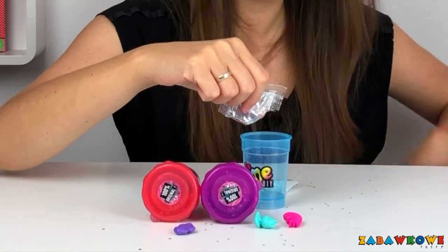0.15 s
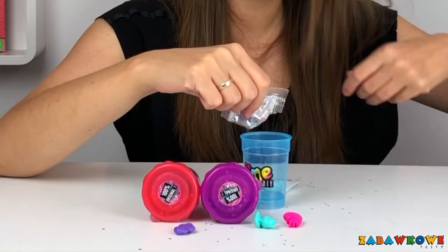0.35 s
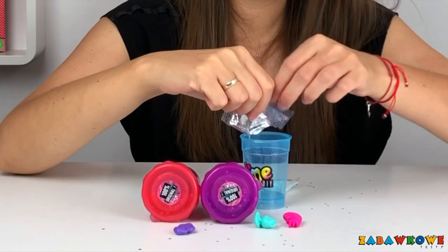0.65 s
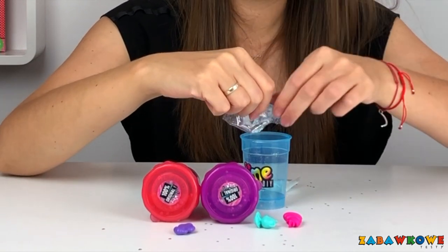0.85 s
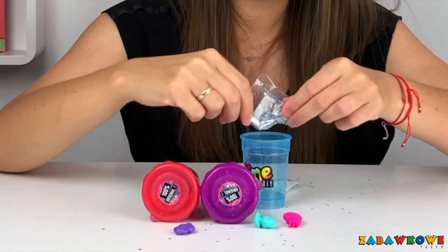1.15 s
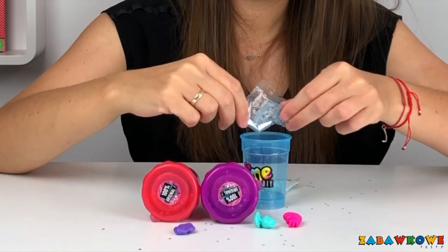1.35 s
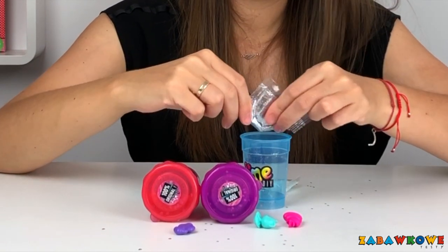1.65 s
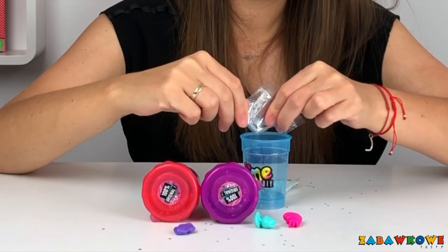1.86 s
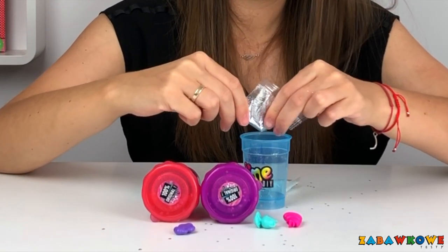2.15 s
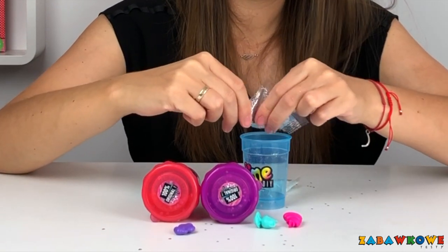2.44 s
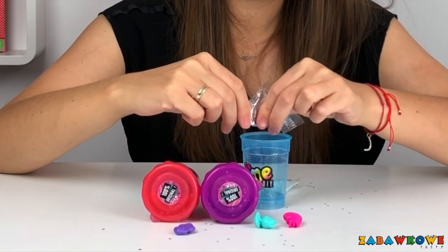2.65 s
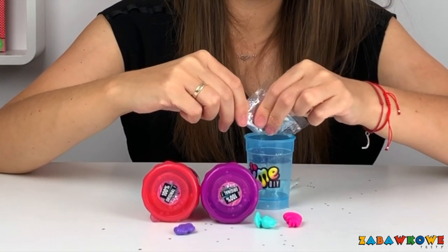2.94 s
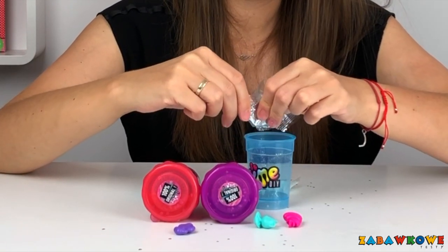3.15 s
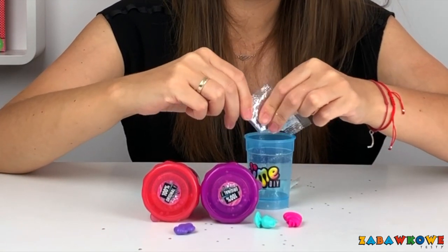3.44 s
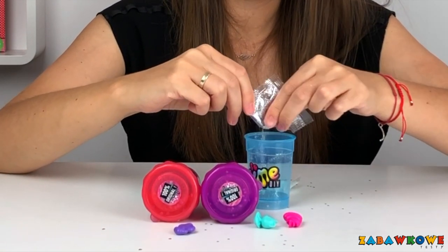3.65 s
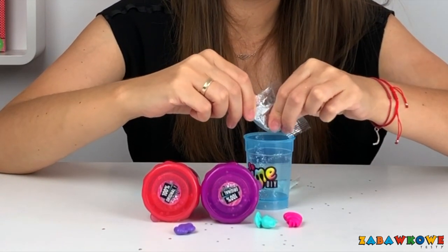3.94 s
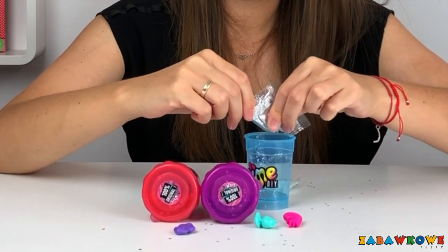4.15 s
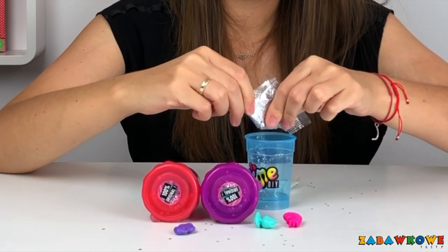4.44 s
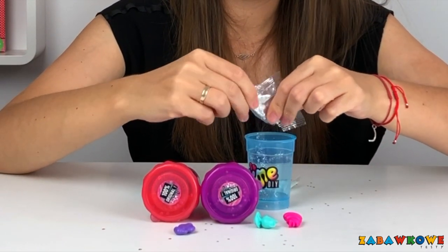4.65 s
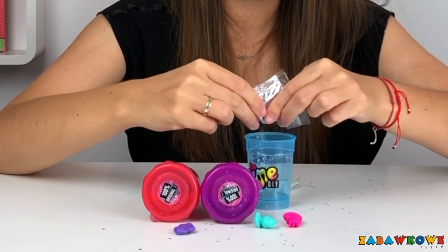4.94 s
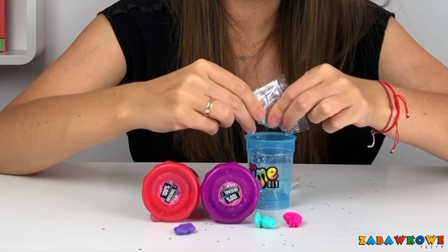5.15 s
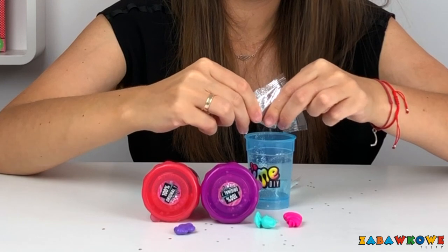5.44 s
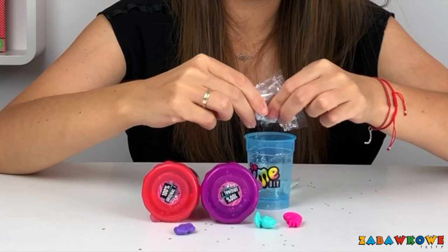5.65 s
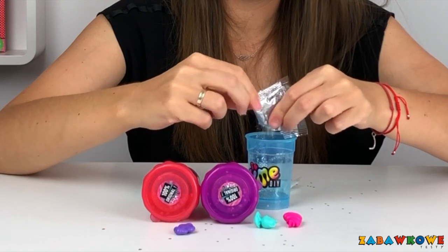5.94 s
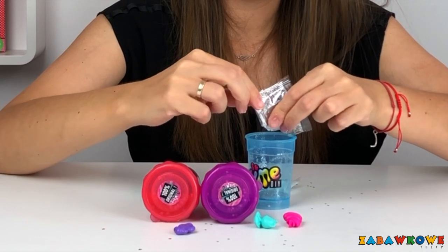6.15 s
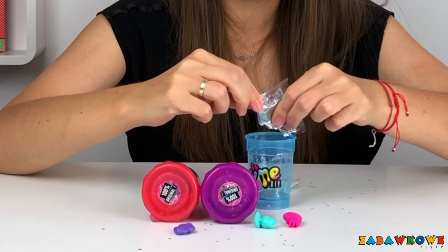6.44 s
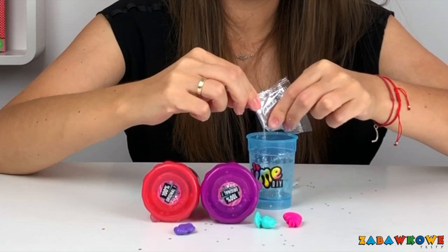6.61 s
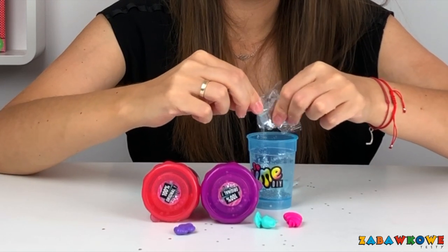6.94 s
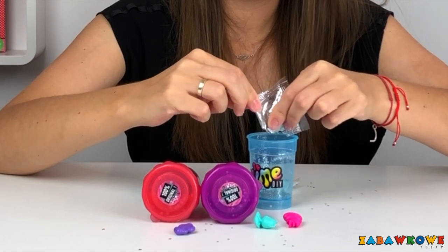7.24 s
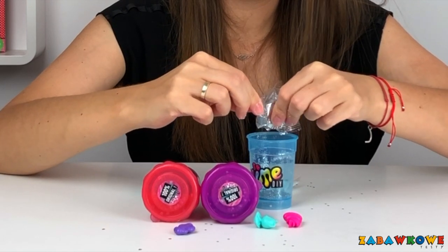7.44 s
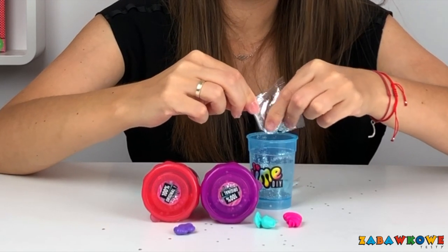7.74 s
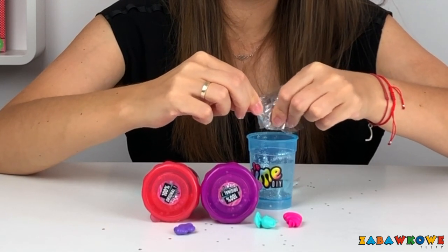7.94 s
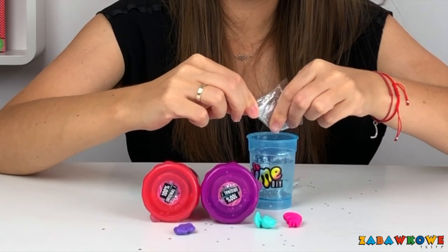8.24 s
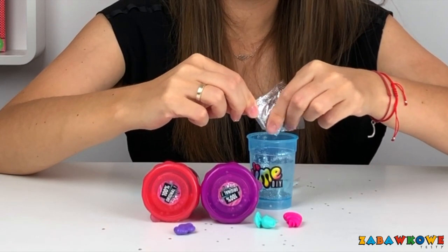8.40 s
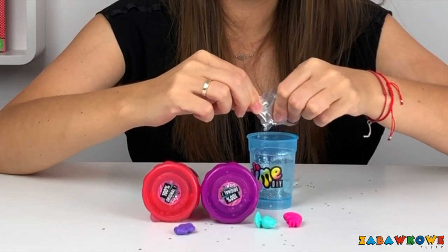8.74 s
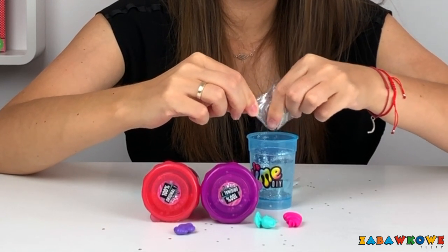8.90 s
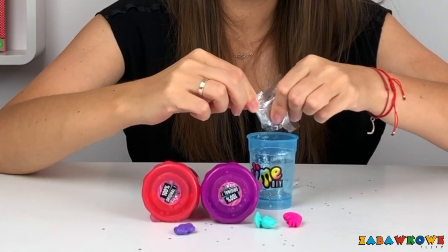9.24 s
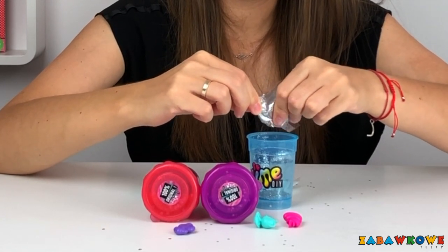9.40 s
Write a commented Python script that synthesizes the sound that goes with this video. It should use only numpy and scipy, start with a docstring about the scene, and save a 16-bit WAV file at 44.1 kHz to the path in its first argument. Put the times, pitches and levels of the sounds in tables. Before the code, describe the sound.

A quiet indoor room heard through a microphone worn on the body: lumpy deep rumble and faint hiss, easing slightly by 3 s. A soft cloth brush passes in the first half second. From about 0.4 s, very low heartbeat thuds repeat roughly every 0.8 s. Around 0.6 s the first small plastic crackles appear, then stay sparse and light until 1.6 s. From 2 s squeezes of the sachet come faster, with crisp bright cracks, duller pops and fine crinkle between them. Brief lulls fall near 3.7, 4.4 and 4.9 s. Soft muffled grip bumps come near 2.9, 4.3, 5.5, 6.3 and 7.7 s. At 6.6 s a single light tap gives a short, hollow plastic knock. From 6.8 s to the end the crackling is densest and loudest, in uneven bursts, with a slight table reflection and short room tail.

```python
"""Quiet room: body sway rumbles into a worn microphone under hiss; a sleeve brushes past and film faintly crinkles.
The heart thuds in as slowing deep cycles. Fingers then squeeze a small plastic sachet over a plastic cup: noise
bursts make each crease a bright crack with a duller pop, above a crinkle of many small ones that grows denser.
From about 3 s, soft low noise swells mark shifts of grip; late on, one tap rings the cup as decaying modes.
Film, thuds and cup get a table-top echo and a room tail of decaying noise."""
import sys
import numpy as np
from scipy import signal
from scipy.fft import rfft, irfft, next_fast_len
from scipy.io import wavfile
from scipy.ndimage import uniform_filter1d, map_coordinates

SR = 44100
rng = np.random.default_rng(int(sys.argv[2]) if len(sys.argv) > 2 else 0)


def master(y):
    """Save y as 16-bit WAV."""
    cut = np.clip(np.atleast_2d(y).T, -1, 1)
    pcm = np.round(cut * 32767)  # scale
    wavfile.write(sys.argv[1], SR, pcm.astype(np.int16))


N = 422037

# spectrum of sway and hiss together, relative: (f/Hz, level/dB)
HUSH_SPECTRUM = [(4, -2), (12, -4), (40, -16), (110, -29), (300, -34), (1000, -42), (1750, -45),
                 (2000, -39), (2250, -51.5), (5000, -51), (16000, -61)]
# cloth brushing as an arm moves: (t/s, level/dB)
SLEEVE_LEVEL = [(0, -65), (.05, -50), (.25, -58.5), (.5, -74)]
# squeezes of the sachet: (grip closed t/s, effort level/dB, held t/s)
SQUEEZES = [(.62, -47, 0.031), (.862, -56, 0.0035), (1.048, -60, 0.022), (1.635, -52, 0.018),
            (1.851, -55, 0.014), (1.931, -51.5, 0.14), (2.135, -51, 0.037), (2.265, -46.5, 0.066),
            (2.423, -45, 0.11), (2.81, -39.5, 0.019), (3.067, -41.5, 0.041), (3.34, -46.5, 0.13),
            (3.61, -47.5, 0.0095), (3.732, -48.5, 0.016), (3.881, -50, 0.012), (4.001, -43.5, 0.065),
            (4.224, -41, 0.018), (4.47, -58, .06), (4.59, -46, 0.02), (4.771, -43, 0.046),
            (4.87, -51, 0.045), (5.175, -42, 0.033), (5.454, -43, 0.0098), (5.6, -50.5, 0.012),
            (5.722, -38.5, 0.019), (6.015, -40.5, 0.013), (6.321, -41, 0.0079), (6.459, -45.5, 0.082),
            (6.585, -40, 0.0067), (6.82, -40, 0.12), (7.163, -39, 0.022), (7.374, -40, 0.007),
            (7.5, -48.5, 0.14), (7.699, -38.5, 0.016), (7.87, -42.5, 0.03), (7.935, -38, 0.13),
            (8.24, -36, 0.076), (8.549, -36, 0.02), (8.4, -45, 0.05), (8.715, -41.5, 0.053),
            (8.9, -34, 0.054), (9.05, -41.5, 0.018), (9.239, -34.5, 0.0068), (9.361, -45.5, 0.11),
            (9.568, -37.5, 0.0072)]
# colour of the cracks, relative: (f/Hz, level/dB)
CRACK_SPECTRUM = [(300, -76), (1300, -8), (2200, -9.5), (3250, -4.5), (3870, -12.5), (4350, -8), (5570, -5),
                  (7580, -5), (10800, -9), (16000, -11)]
# colour of the pops, relative: (f/Hz, level/dB)
POP_SPECTRUM = [(150, -38), (250, -14), (370, -3.5), (780, 1), (1080, -6.5), (1350, 0.5), (2600, -8.5),
                (4000, -14), (7000, -103)]
# centre of the band the cracks favour, lower while a wide fold is worked: (t/s, f/Hz)
FOLD_BAND = [(2.95, 6830), (3.07, 3160), (3.25, 6750), (5.62, 6500), (5.76, 2560), (5.9, 6500)]
# heartbeats, first one and period: (t/s)
BEATS = 0.4 + 0.77 * np.arange(14)
# crease snaps that stand out from the crinkle around them, faint to loud:
# (t/s, crack energy level/dB, pop energy level/dB)
SNAPS = [(0.6137, -15.5, -12), (0.6229, -10, -14), (0.6925, -28, -18.5), (0.754, -12.5, -11.5),
         (0.8538, -19, -36), (0.8752, -42, -30), (0.9234, -31, -20.5), (1.0237, -19.5, -20.5),
         (1.174, -42, -31), (1.2745, -48.5, -29), (1.378, -30.5, -31), (1.449, -27, -27.5),
         (1.543, -22, -26), (1.589, -39, -21.5), (1.7337, -10.5, -21), (1.8034, -17.5, -16.5),
         (1.9083, -9.0, -18), (1.9652, -22, -18.5), (2.091, -10.5, -21), (2.1301, -13.5, -16.5),
         (2.172, -12.5, -33), (2.2002, -8.5, -24.0), (2.2269, -11.5, -34), (2.2454, -3.5, -15.5),
         (2.2829, -14, -9), (2.3733, -13.5, -19), (2.4239, -14, -13), (2.5128, -9.5, -38), (2.574, -4, -18),
         (2.5902, -4.5, -36), (2.7388, -10.5, -28), (2.7828, -6.5, -34.5), (2.795, -6.5, -16.0),
         (2.803, -8, -21), (3.0026, -6.5, -16), (3.0303, -4, -27), (3.0398, -6, -15), (3.0773, -4.5, -13),
         (3.1297, -6, -41), (3.1944, -4.5, -51), (3.277, -7.5, -27), (3.3276, -11, -20), (3.402, -9.5, -12),
         (3.5869, -16, -11), (3.6182, -13.5, -14.5), (3.806, -16.5, -26), (3.8631, -16.0, -20),
         (3.8694, -15.0, -19), (3.9188, -21, -13.5), (3.9819, -4.5, -18.5), (4.0005, -9.5, -20),
         (4.0567, -5, -40), (4.071, -1, -18), (4.14, -11.5, -17), (4.1733, -3, -11.5), (4.2112, -11.0, -27),
         (4.2245, -9, -14), (4.2507, -11, -11), (4.3373, -23.5, -17), (4.369, -24, -23),
         (4.4071, -33, -24.5), (4.46, -24, -23), (4.5008, -16.5, -27.0), (4.5428, -17.5, -23),
         (4.5664, -13.0, -10.5), (4.5758, -3.5, -28), (4.622, -8.5, -22.5), (4.6379, -7, -10.0),
         (4.6847, -9, -27), (4.7262, -5.0, -19), (4.7689, -3.5, -9.5), (5.0185, -30, -52),
         (5.096, -17, -9.5), (5.173, -2, -12), (5.1814, -6.5, -22.0), (5.2194, -19, -11.5),
         (5.2771, -9, -16), (5.397, -13, -24.0), (5.4227, -4.5, -15), (5.4337, -11.5, -20),
         (5.446, -12, -26), (5.4589, -8, -13.5), (5.6145, -19, -21.5), (5.642, -23, -42),
         (5.7012, -3.5, -12.5), (5.731, -10, -12), (5.7496, -7, -20), (5.7799, -4, -12), (5.978, -22, -23),
         (6.0319, -6.5, -12.5), (6.0606, -8.5, -13.5), (6.2781, -4, -8.5), (6.3113, -5, -10),
         (6.323, -13, -10.5), (6.4487, -4.5, -34), (6.4665, -21, -29.0), (6.5002, -7.5, -13.5),
         (6.538, -4.5, -26), (6.5916, -5.5, -13), (6.6074, -4, -8.5), (6.7842, -4, -18.5), (6.823, -5, -25),
         (6.8485, -9, -19), (6.8627, 0, -5.0), (6.8693, -14, -27), (6.8907, -4.5, -13),
         (6.921, -6.5, -37.0), (6.981, -4, -6), (7.085, -9.0, -30), (7.1019, 1, -17), (7.1488, -2.5, -9.5),
         (7.2758, -12, -37), (7.3574, -4, -12), (7.3672, -5.5, -6.5), (7.417, -10.5, -44),
         (7.4823, -5.5, -18.5), (7.5344, -10.5, -30), (7.5468, -7.5, -14), (7.684, -2.5, -24),
         (7.6978, -9.5, -14.5), (7.7084, -8, -24), (7.7137, -5, -31), (7.9086, -3.0, -28.5),
         (7.9505, -3.5, -32), (8.0258, -6.5, -33), (8.1304, 0.5, -23), (8.2339, -3, -32),
         (8.2619, -10, -10.5), (8.276, -16, -24.0), (8.383, -5.5, -22.5), (8.3958, -6, -13),
         (8.4777, -5.5, -25), (8.5732, -5, -4.5), (8.633, -5.0, -11), (8.689, -4.5, -32), (8.7115, -9, -37),
         (8.784, -3, -35), (8.9161, -3, -28), (8.9409, -9, -2), (8.9756, -4.5, -29), (9.1192, -2.5, -37),
         (9.2099, -7, -18.5), (9.2254, -3.5, -6), (9.3547, -4, -15.5), (9.4197, -4.5, -33),
         (9.5416, -1.5, -22.5), (9.5518, -12, -22)]
# soft low thuds as fingers shift their grip: (t/s, level/dB, length t/s)
GRIP_SHIFTS = [(2.865, -46, 0.088), (4.25, -50, 0.06), (5.45, -51.5, 0.056), (6.299, -49, 0.042),
               (7.663, -49, 0.076)]
# knocks on the cup: (t/s, level/dB)
TAPS = [(6.6407, -16)]
# ringing modes of the cup: (f/Hz, level/dB, 60 dB decay t/s)
CUP_MODES = [(376.7, -18.5, 0.095), (756, -16.5, 0.037), (1230, -22, 0.34), (1280, -3, 0.038)]
# echo off the table top: (delay t/s, level/dB)
TABLE_ECHOES = [(.0042, -19.5)]
# decay of the room tail: (f/Hz, 60 dB decay t/s)
ROOM_DECAY = [(300, 0.39), (2000, 0.31), (6000, 0.37), (15000, 0.2)]

# effort: grip closing, letting go, fingers still
RISE_DB_PER_S, FALL_DB_PER_S, REST_DB = 192, 140, -68
BEAT_DB = -39.5  # typical heartbeat
SWAY_TOP_HZ, TOP_HZ = 300, 16000  # sway/hiss split, upper band limit


def amp(db):
    """Decibels to linear gain."""
    return 10 ** (np.asarray(db) / 20)


def unit(x):
    """x scaled to an RMS of 1."""
    return x / np.sqrt(np.mean(x ** 2) + 1e-20)


def along(points, hz):
    """Values between (f/Hz, value) points, read on a log frequency axis."""
    f, v = np.transpose(points)
    return np.interp(np.log(hz + 1), np.log(f + 1), v)


def wobble(rate):
    """A smooth random curve, rate knots a second."""
    knots = rng.standard_normal(int(N * rate / SR) + 4)
    return map_coordinates(knots, [np.arange(N) * rate / SR])


def filtered(x, response):
    """x with its spectrum multiplied by a response of frequency."""
    m = next_fast_len(N + SR)
    return irfft(rfft(x, m) * response(np.fft.rfftfreq(m, 1 / SR)), m)[:N]


def coloured(x, spectrum):
    """x through a causal, minimum-phase filter whose gain follows the spectrum."""
    gain = amp(along(spectrum, np.fft.rfftfreq(4096, 1 / SR)))
    cep = irfft(np.log(gain + 1e-6))
    # folding the cepstrum onto positive time gives minimum phase
    cep[1:2048] *= 2
    cep[2049:] = 0
    impulse = irfft(np.exp(rfft(cep)))
    return signal.fftconvolve(x, impulse)[:N]


def coloured_rows(rows, spectrum):
    """The spectra of short rows after a colour, scaled so that their norm is that of the coloured sound."""
    hz = np.fft.rfftfreq(rows.shape[1], 1 / SR)
    return rfft(rows) * amp(along(spectrum, hz)) * np.sqrt(2 / rows.shape[1])


def placed(times, shapes):
    """Sum of short shapes, one row each, started at the given times."""
    starts = np.round(np.asarray(times) * SR).astype(int)
    at = starts[:, None] + np.arange(shapes.shape[1])
    return np.bincount(at.ravel(), shapes.ravel(), N + SR)[:N]


def hush():
    """Lumpy body sway in the deep bass over room and microphone hiss, both easing as the arms rest."""
    def sway_band(hz):
        return amp(along(HUSH_SPECTRUM, hz)) * (hz < SWAY_TOP_HZ)

    def hiss_band(hz):
        return amp(along(HUSH_SPECTRUM, hz)) * (hz >= SWAY_TOP_HZ)

    sway = filtered(rng.standard_normal(N), sway_band)
    hiss = filtered(rng.standard_normal(N), hiss_band)
    level_db = np.interp(np.arange(N) / SR, [.5, 3], [-45, -48])
    lumps = amp(3.4 * wobble(8.3))
    return amp(level_db) * unit(lumps * sway + hiss)


def sleeve():
    """A soft rustle: noise in the dull colour of cloth, its level drifting slightly."""
    level_db = np.interp(np.arange(N) / SR, *np.transpose(SLEEVE_LEVEL), right=-120)
    cloth = [(200, -2.5), (1500, -9), (5000, -10.0), (16000, -21.0)]  # (f/Hz, level/dB)
    return amp(level_db + 0.61 * wobble(21)) * unit(coloured(rng.standard_normal(N), cloth))


def effort_db():
    """Finger work: each squeeze rises, holds and lets go; powers add above a resting level."""
    t = np.arange(0, N, 64) / SR
    power = amp(2 * REST_DB)  # doubled dB turn amplitude into power
    for s, db, held in SQUEEZES:
        closing = RISE_DB_PER_S * np.maximum(s - t, 0)
        letting_go = FALL_DB_PER_S * np.maximum(t - s - held, 0)
        power = power + amp(2 * (db - closing - letting_go))
    return np.interp(np.arange(N) / SR, t, 10 * np.log10(power))


def bursts(times, level_db, t60, centre_hz, spectrum):
    """A quick rise to a sharp kick and a short noise tail, each fold with its own length and favoured band."""
    t = np.arange(SR // 60) / SR
    length = np.exp(0.26 * rng.standard_normal((len(times), 1)))
    rows = amp(-60 * t / (t60 * length)) * rng.standard_normal((len(times), len(t)))
    rise_s = 0.00035
    rows *= 1 - np.exp(-t / rise_s)
    rows[:, round(rise_s * SR)] += 3  # the kick

    # a resonance added to the plain burst
    hz = np.fft.rfftfreq(2 * len(t), 1 / SR)
    c = centre_hz[:, None]
    favoured = 1.18 + 1j * hz * 0.25 * c / (c * c - hz * hz + 1j * hz * 0.17 * c)
    rows = irfft(rfft(rows, 2 * len(t)) * favoured)[:, :len(t)]

    # level_db sets the energy after colouring
    rows = rows / np.linalg.norm(coloured_rows(rows, spectrum), axis=1, keepdims=True)
    return coloured(placed(times, amp(level_db)[:, None] * rows), spectrum)


def creases(times, crack_db, pop_db, crack_t60):
    """A crease flips: a bright crack from the fold and a duller pop from the panel, each with its own band."""
    fold, panel = rng.standard_normal((len(times), 2)).T
    crack_hz = np.interp(times, *np.transpose(FOLD_BAND)) * np.exp(0.33 * fold)
    pop_hz = 1075 * np.exp(0.41 * panel)
    crack = bursts(times, crack_db, crack_t60, crack_hz, CRACK_SPECTRUM)
    return crack + bursts(times, pop_db, 0.011, pop_hz, POP_SPECTRUM)


def crinkle():
    """Clumps of small creases, more and louder under harder finger work, over the rub of skin on film."""
    level_db = effort_db()
    per_second = 300 * amp(.2 * (level_db + 45) + 3 * wobble(30))
    at = np.flatnonzero(rng.random(N) < per_second / SR)
    size_db = level_db[at] + 15.5 + 5.8 * np.minimum(rng.exponential(size=len(at)), 1.7)
    # some folds favour the crack, others the pop
    tilt_db = 5 * np.clip(rng.standard_normal(len(at)), -1.2, 2.5)
    small = creases(at / SR, size_db - tilt_db, size_db - 9.5 + tilt_db, 0.0063)

    bright = unit(coloured(rng.standard_normal(N), CRACK_SPECTRUM))
    dull = unit(coloured(rng.standard_normal(N), POP_SPECTRUM))
    grit = amp(level_db - 13 + 4.7 * wobble(500))
    return small + grit * (bright + 0.12 * dull)


def heart():
    """Each beat swells and fades over a few cycles that slow down from 27 Hz."""
    t = np.arange(SR // 3) / SR
    rise_s = .04
    swell = (t / rise_s) * np.exp(1 - t / rise_s)
    thump = np.sin(2 * np.pi * 27 * t * (1 - 0.85 * t)) * swell
    level_db = BEAT_DB + 2.0 * rng.standard_normal((len(BEATS), 1))
    # started early, so the listed time falls within the swell
    return placed(np.subtract(BEATS, .02), amp(level_db) * thump)


def snaps():
    """The distinct creases flip one by one, with longer cracks than the crinkle."""
    return creases(*np.transpose(SNAPS), 0.0093)


def thuds():
    """A swell of low noise for each shift of grip, fullest a third of the way through its length."""
    s, db, length = np.transpose(GRIP_SHIFTS)
    u = np.arange(SR // 3) / SR / length[:, None]
    swells = placed(s, amp(db)[:, None] * 3 * u * np.exp(1 - 3 * u))
    pad = [(120, -23.0), (330, -5.5), (600, -15.0), (3000, -33)]  # (f/Hz, level/dB)
    return swells * unit(coloured(rng.standard_normal(N), pad))


def cup():
    """A tap rings the hollow cup; loose glitter and thin walls roughen each decaying mode."""
    t = np.arange(SR // 4) / SR
    ring = np.zeros(len(t))
    for hz, db, t60 in CUP_MODES:
        rough = 1 + 0.76 * unit(uniform_filter1d(rng.standard_normal(len(t)), size=70))
        ring += amp(db - 60 * t / t60) * rough * np.sin(2 * np.pi * hz * t)
    onset = 1 - np.exp(-t / 0.00072)
    s, db = np.transpose(TAPS)
    return placed(s, amp(db)[:, None] * ring * onset)


def room(x):
    """A near echo, then a noise tail whose decay varies with frequency, drawn anew every third of a second."""
    near = x.copy()
    for s, db in TABLE_ECHOES:
        near += amp(db) * np.pad(x, (round(s * SR), 0))[:N]
    step, wet = SR // 3, np.zeros(N + 2 * SR)
    for at in range(0, N, step):
        hz, t, z = signal.stft(rng.standard_normal(SR // 2), SR, nperseg=256)
        decay = amp(-60 * t / along(ROOM_DECAY, hz)[:, None])
        tail = signal.istft(z * decay, SR, nperseg=256)[1]
        part = signal.fftconvolve(x[at:at + step], tail / np.linalg.norm(tail))
        wet[at + SR // 200:][:len(part)] += part  # 5 ms behind the direct sound
    return near + amp(-9.5) * wet[:N]


def scene():
    """Film, thuds and cup sound in the room; sleeve, heart and hush stay dry."""
    in_room = snaps() + crinkle() + thuds() + cup()
    return (room(in_room) + sleeve() + heart() + hush())[None]


def record(dry):
    """Nothing is kept above the band limit."""
    return filtered(dry[0], lambda hz: hz < TOP_HZ)[None]


dry = scene()
out = record(dry)
master(out)
```